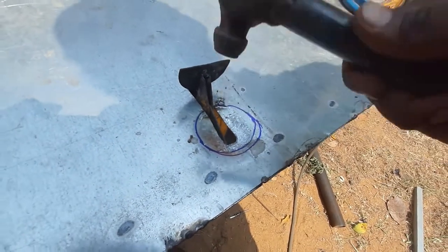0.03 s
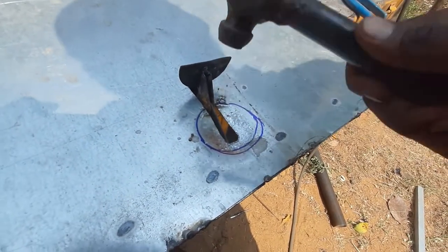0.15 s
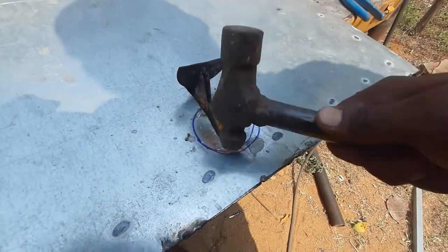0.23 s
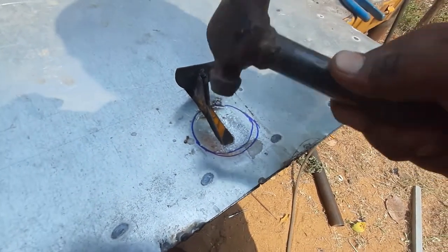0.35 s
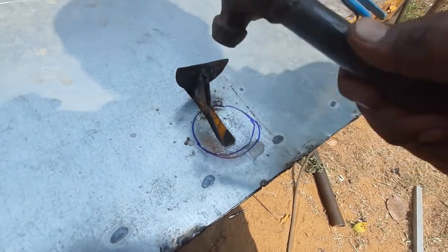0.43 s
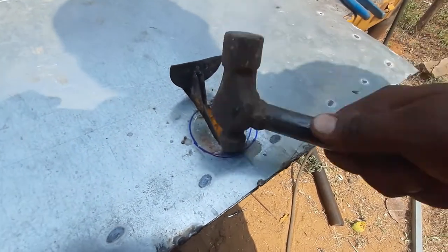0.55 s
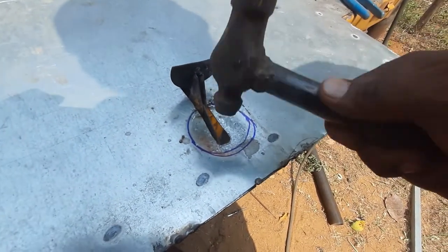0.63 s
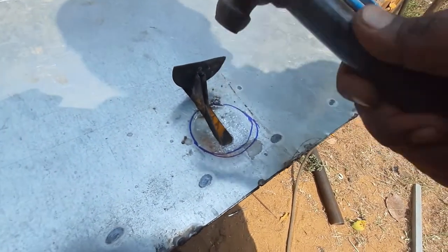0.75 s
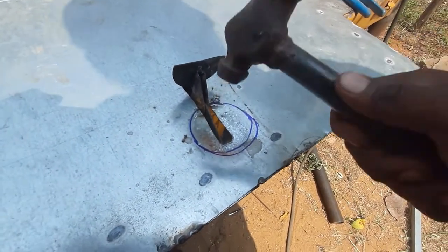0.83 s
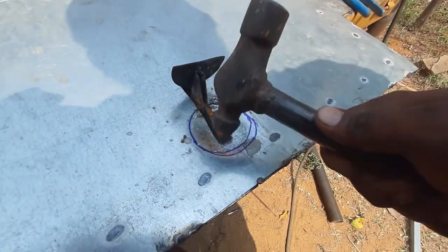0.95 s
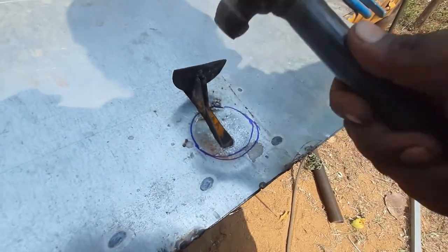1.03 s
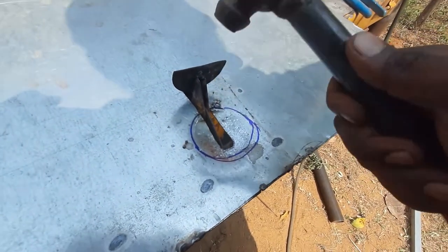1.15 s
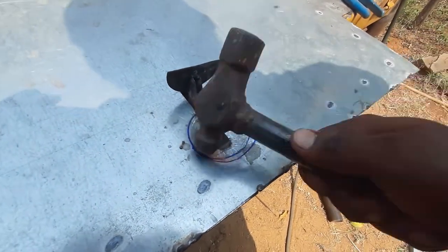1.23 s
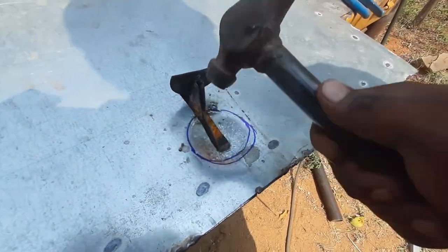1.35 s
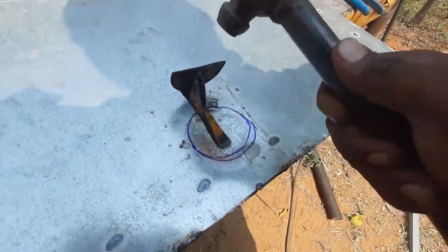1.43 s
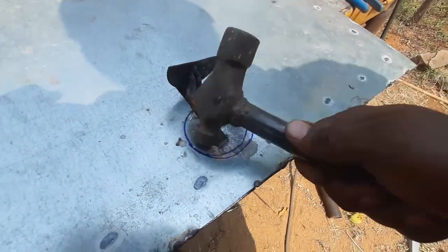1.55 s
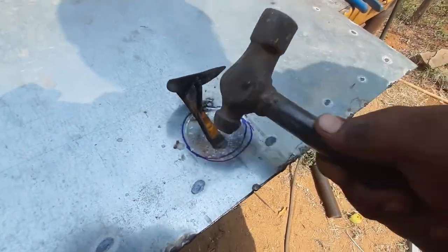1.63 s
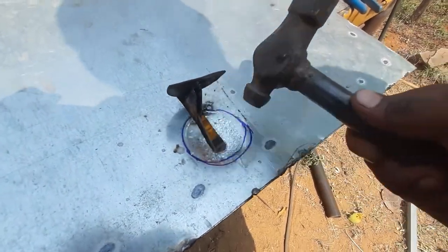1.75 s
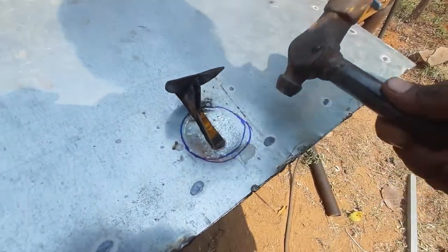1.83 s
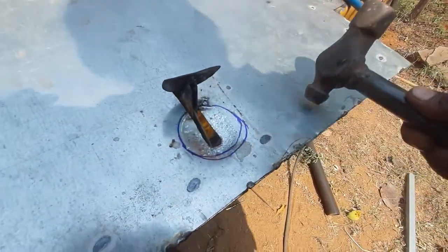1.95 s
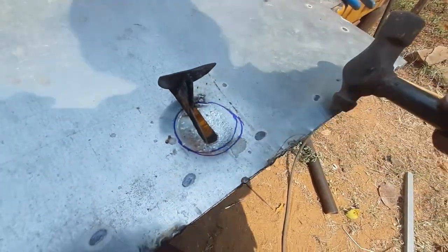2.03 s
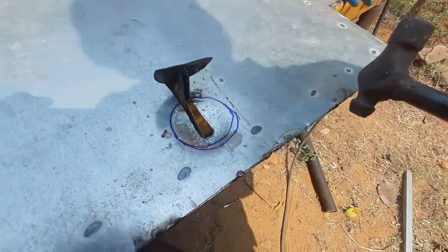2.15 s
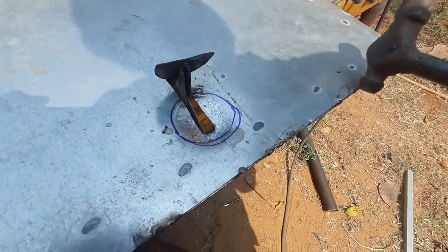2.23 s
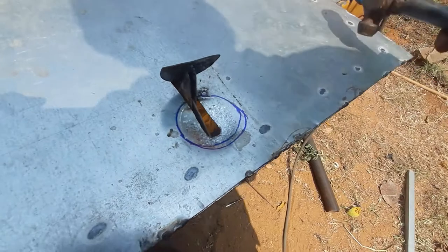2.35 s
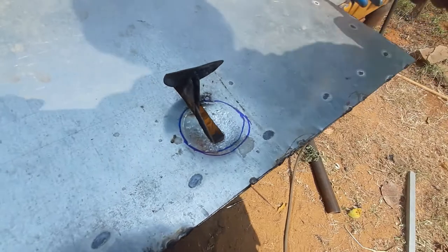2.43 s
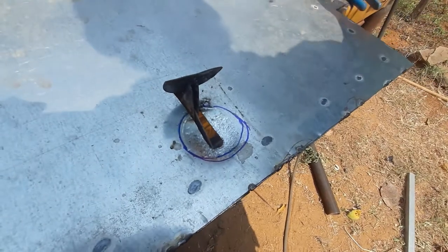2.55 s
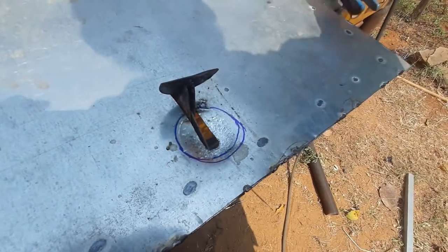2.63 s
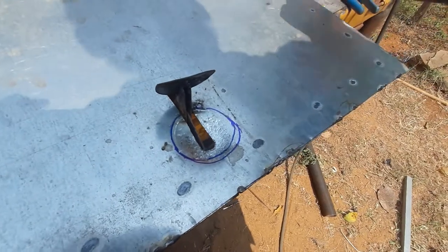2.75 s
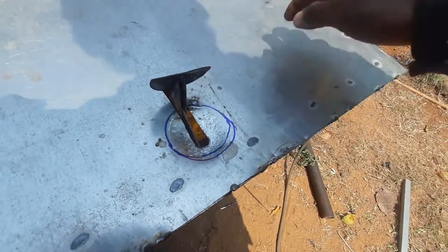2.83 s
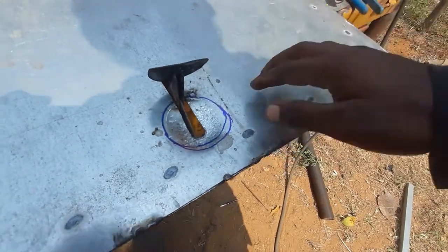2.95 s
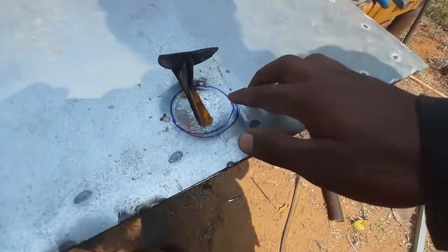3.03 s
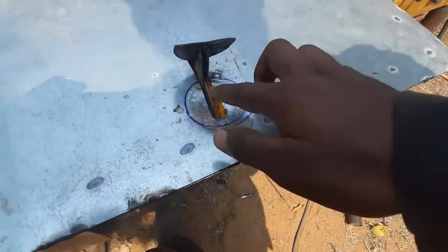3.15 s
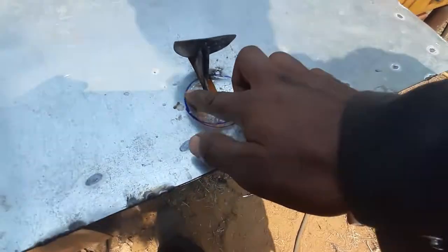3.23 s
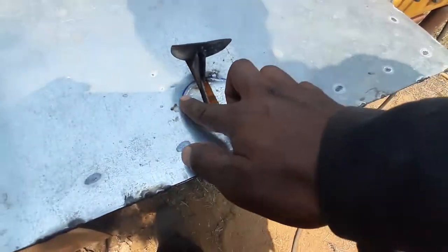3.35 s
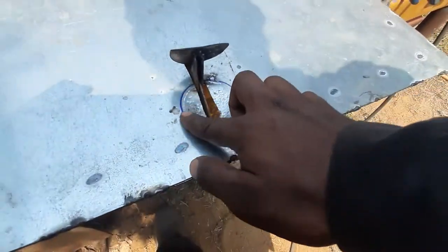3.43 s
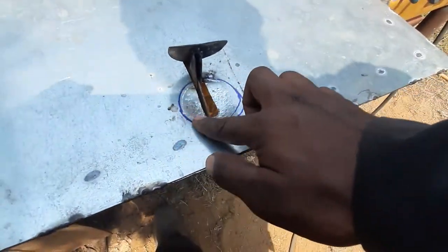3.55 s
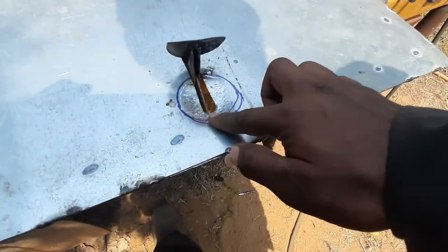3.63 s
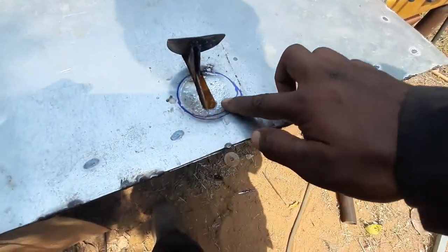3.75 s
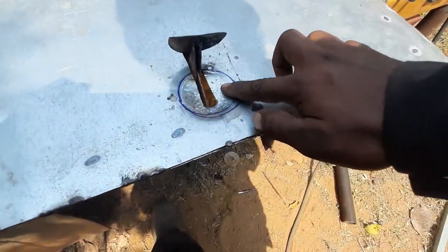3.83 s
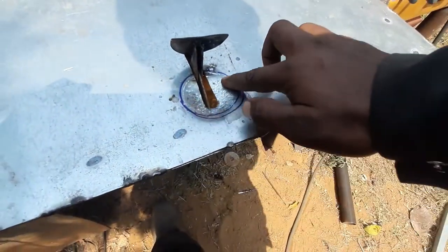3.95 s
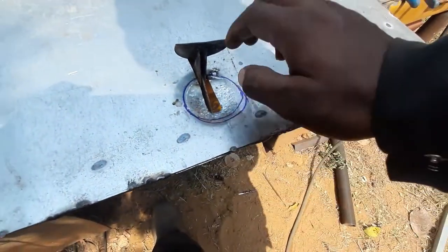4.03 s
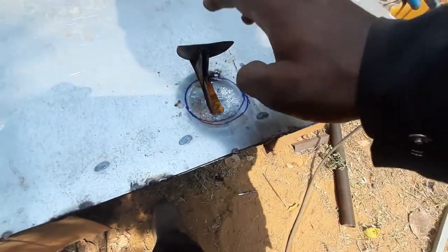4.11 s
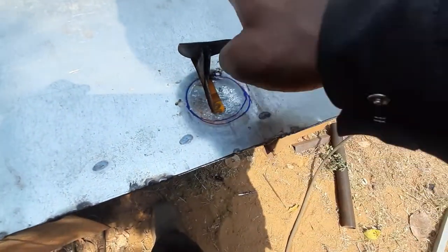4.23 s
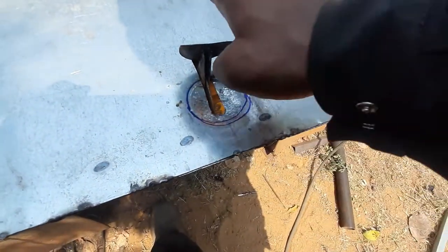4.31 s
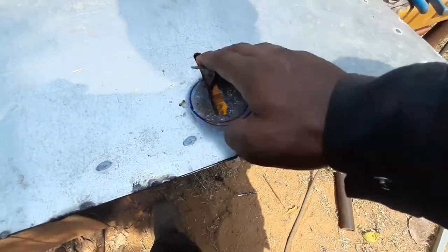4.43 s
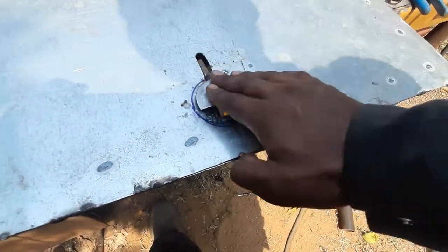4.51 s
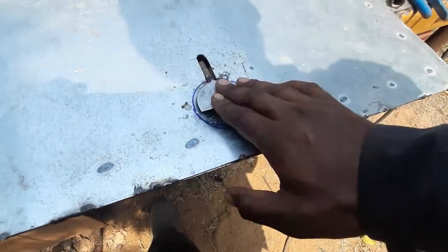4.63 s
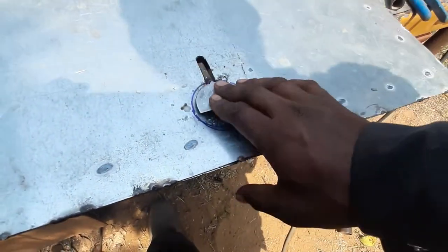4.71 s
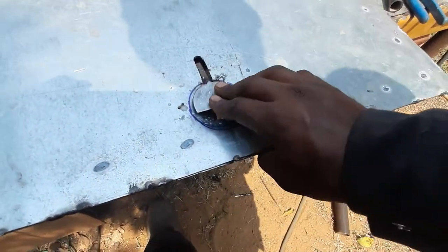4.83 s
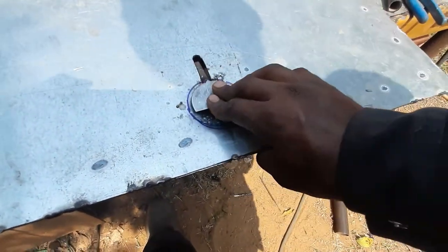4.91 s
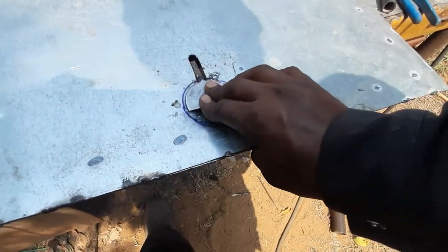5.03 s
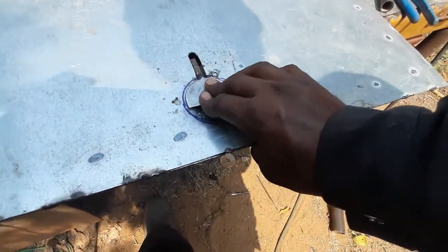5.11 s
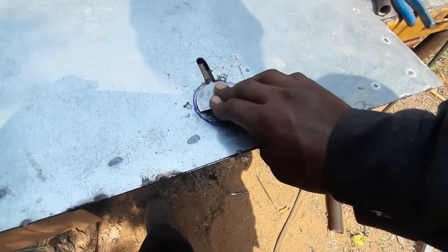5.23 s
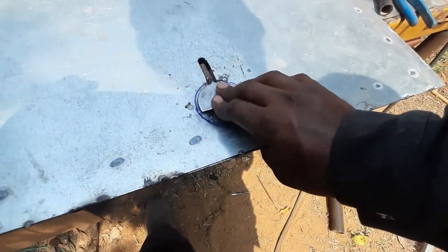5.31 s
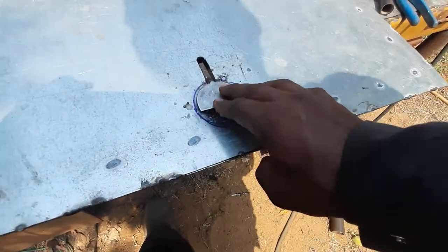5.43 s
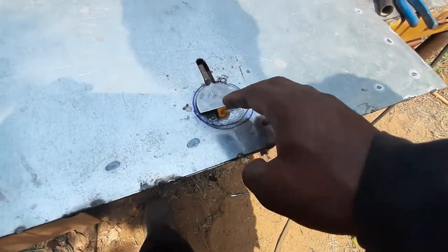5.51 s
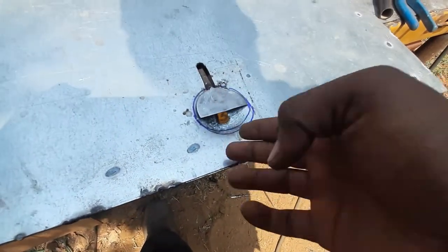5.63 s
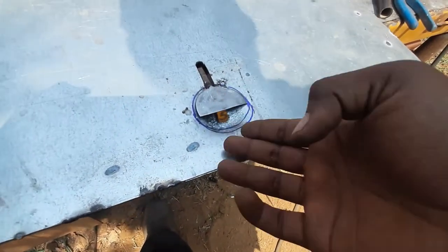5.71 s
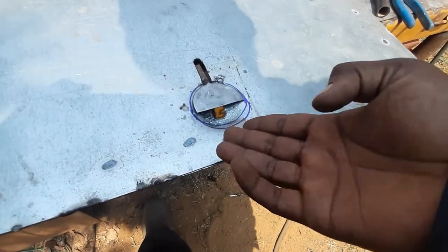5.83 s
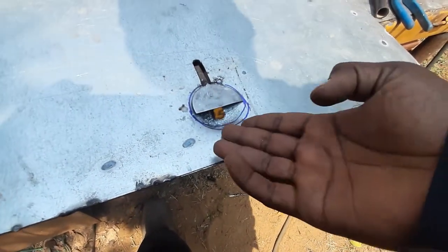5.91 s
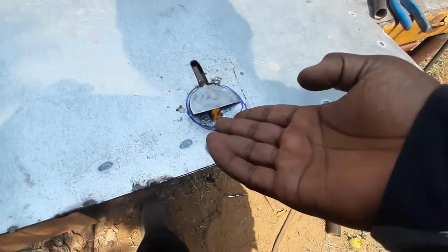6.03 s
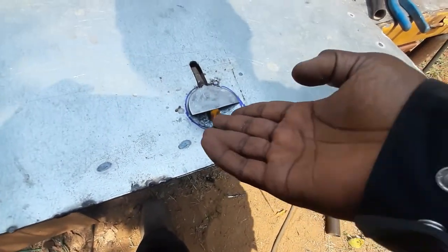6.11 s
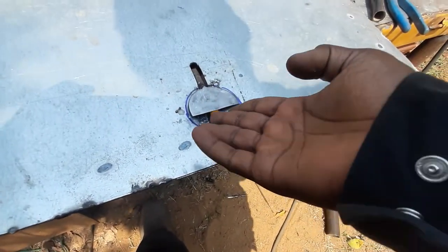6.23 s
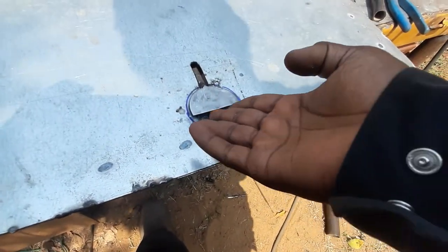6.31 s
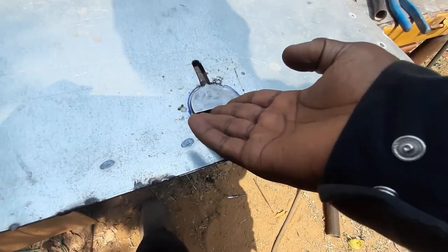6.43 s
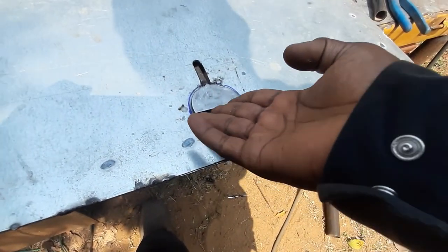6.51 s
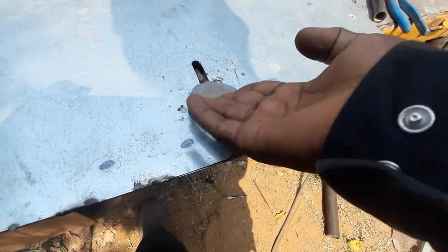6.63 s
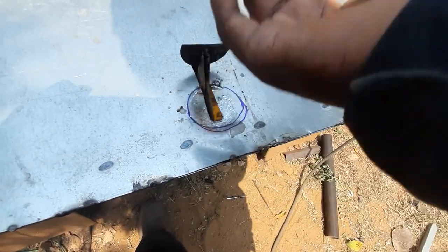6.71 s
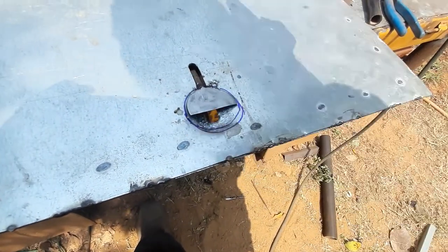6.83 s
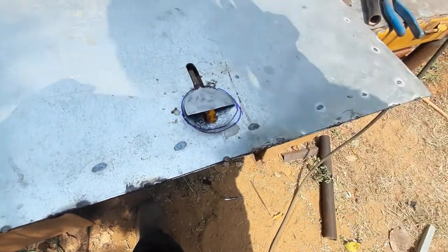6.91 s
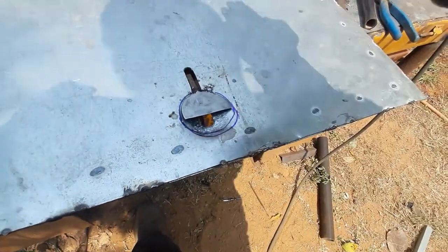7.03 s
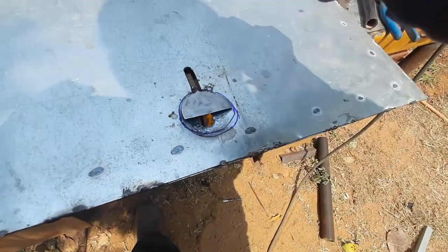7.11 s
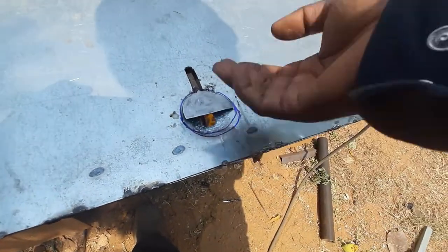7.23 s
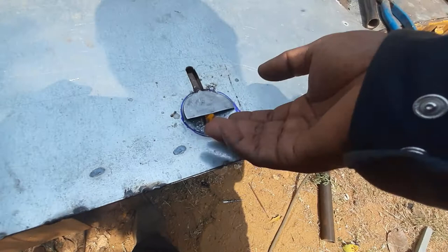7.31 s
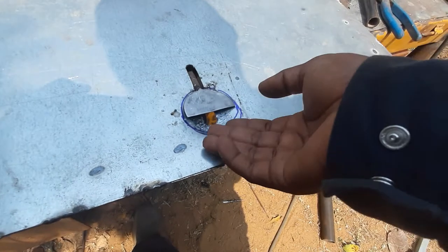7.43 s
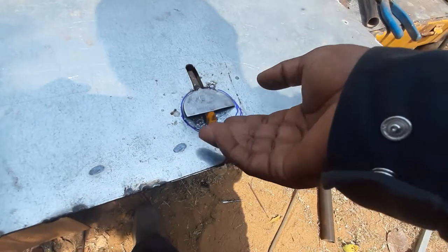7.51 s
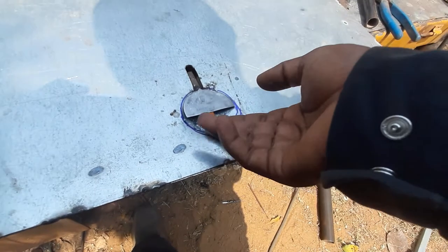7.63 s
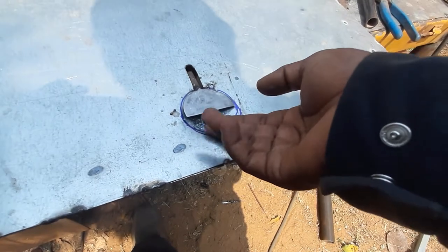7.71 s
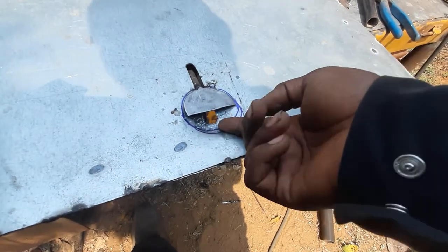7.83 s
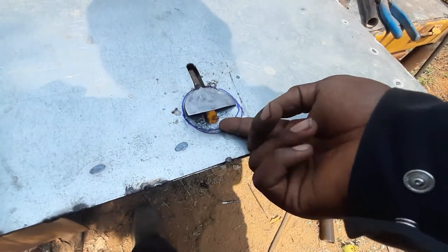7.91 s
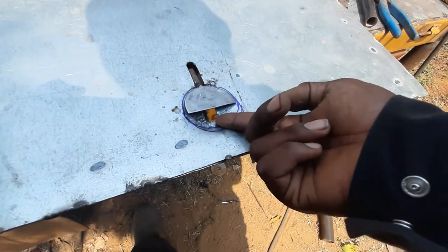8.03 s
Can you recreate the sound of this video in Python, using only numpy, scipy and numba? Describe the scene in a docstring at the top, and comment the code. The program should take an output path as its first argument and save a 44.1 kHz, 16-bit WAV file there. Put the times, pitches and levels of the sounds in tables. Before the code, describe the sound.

The tail of one blow, then five loud, harsh steel crashes on a resonant sheet. After a pause the hammer lands heavily, rebounds and rings briefly. Quieter handling follows: fingertips hissing on steel, a small metal flap clacking and ringing, cloth rustling and low rumble as an arm leans, then a sharp cluster of knocks. Close stereo microphones in open air, compressed on loud contacts.

```python
"""Hard, crashing steel, close by and outdoors: a hammer drives a chisel into a big sheet, about three blows a second.
The hammer is then dropped on the sheet; a hand rubs over the metal and tips the loose piece in the cut, which clatters.
Each contact is a push and chatter played into dense plate modes that crash and die into a low drone.
Filtered noise makes hand, sleeve and open air; decaying sines ring hammer head and piece.
A microphone pair hears it in stereo, and the recorder's limiter flattens the loud contacts."""
import sys
import numpy as np
from scipy import signal
from scipy.fft import rfft, irfft
from scipy.io import wavfile
from scipy.ndimage import uniform_filter1d
from numba import njit

SR = 44100
rng = np.random.default_rng(int(sys.argv[2]) if len(sys.argv) > 2 else 0)


def materialize(psi):
    """Save the field psi as 16-bit PCM at rate SR to the path in sys.argv[1].

    A 1-D psi becomes a single channel; in a 2-D psi each row is a channel.
    """
    bounded = np.clip(np.atleast_2d(psi).T, -1, 1)
    quanta = np.round(bounded * 32767).astype(np.int16)
    wavfile.write(sys.argv[1], SR, quanta)


N = 355446
TIME = np.arange(N) / SR
RING_TIME = np.arange(3 * SR) / SR
PUSH_TIME = np.arange(8192) / SR
TOP_HZ = 15900

# open air, low rumble: (frequency [Hz], relative density [dB per Hz])
RUMBLE_SPECTRUM = [(25, -3.5), (55, 4), (105, -1.5), (200, -1.5), (400, -3), (700, -17), (1200, -24),
                   (2100, -28.5), (3200, -45)]
# open air, faint hiss: (frequency [Hz], relative density [dB per Hz])
AIR_SPECTRUM = [(500, 8), (2000, 6), (3000, -3), (5500, -7), (8000, -2), (10000, -11), (15000, -14)]
RUMBLE_DB, AIR_DB = -65, -79.5

# fingertips wiping the sheet: (time [s], length [s], level [dB])
WIPES = [(3.35, 0.12, -65), (3.52, 0.37, -67.5), (5.35, .12, -74), (6.0, 0.4, -77.5), (6.32, .08, -70.5)]
WIPE_ATTACK_S, WIPE_T60_S = 0.035, 0.33
# the arm shifting along the sheet: (time [s], length [s], level [dB])
ARM_MOVES = [(4.25, 0.17, -81), (5.5, 0.42, -72), (5.95, 0.8, -61), (7.45, 0.39, -79)]
ARM_ATTACK_S, ARM_T60_S = 0.11, 0.72
# hiss of skin on steel: (frequency [Hz], relative density [dB per Hz])
SKIN_SPECTRUM = [(2000, -13), (5000, -10), (8000, -5.5), (12500, -1.5), (16000, -1)]
# rustle of the sleeve: (frequency [Hz], relative density [dB per Hz])
SLEEVE_SPECTRUM = [(400, -9), (1100, -9), (2000, -0.5), (3000, -15), (6000, -21), (12000, -30.5)]
# rumble of the sheet under the leaning arm: (frequency [Hz], relative density [dB per Hz])
LEAN_SPECTRUM = [(30, -2), (55, 4.5), (115, 4), (260, -0.5), (420, -3), (700, -12.5), (1300, -24),
                 (3000, -46)]
# rumble level under a 0 dB rustle, and dB of rumble per dB of rustle
LEAN_DB, LEAN_SLOPE = -26, 0.41

# clicks of steel edges and fingernails: (time [s], level [dB], pitch [Hz])
TICKS = [(4.5132, -7.5, 5000), (4.952, -57, 10800), (4.98, -53, 10300), (5.618, -72, 2980),
         (6.453, -40, 5060), (6.566, -53, 12400), (6.837, -18, 6250), (7.82, -66.5, 3150)]

# stereo picture: (frequency [Hz], left minus right [dB], likeness of the two sides [0-1])
STEREO_SPREAD = [(60, 3, .65), (250, .5, .85), (550, .5, .6), (1100, 6, .15), (2000, 8.5, .03),
                 (4000, 4, .02), (8000, -3, .02), (14000, -4.5, .02)]
# dense modes of the sheet:
# (frequency [Hz], relative density [dB per Hz], crash t60 [s], drone under crash [dB], drone t60 [s])
SHEET_MODES = [(30, -28.5, 0.41, -13.5, 2.2), (60, -5, 0.46, -11, 1.8), (109, -2, 0.53, -19.5, 4),
               (260, 1, 0.31, -5, 1.92), (516, 2.5, 0.47, -14.5, 1.85), (807, -4.5, 0.6, -9.5, 1.56),
               (1035, -9, 0.45, -10, 1.5), (1560, -6, 0.54, -21, 1.08), (1940, 1, 0.44, -23, 1.3),
               (2920, -10, 0.42, -27.5, .8), (5404, -18.5, 0.34, -26, 0.7),
               (7950, -18.5, 0.37, -36.5, 0.18), (9350, -26, 0.37, -32.5, 0.34),
               (11500, -13, 0.28, -31.5, 0.32)]
# the sheet giving under the point of contact: (frequency [Hz], level [dB], t60 [s])
FLEX_MODES = [(63.6, -19.5, 0.18), (185, -2, 0.035), (486, -3.5, 0.047)]
# low modes that hum on between blows: (frequency [Hz], level [dB], t60 [s])
HUM_MODES = [(105.7, -37.5, 2), (203.8, -27.5, 1.7), (244.4, -31, 2.5), (286, -29.5, 1), (452, -32, 1.0)]

# the loose piece tipping and knocking in the cut:
# (time [s], force [dB], boom and thud [dB], treble [dB], chatter decay constant [s])
PIECE_KNOCKS = [(4.428, -19, -1.5, 2.5, 0.02), (4.455, -9, -5, -9.5, 0.0093), (4.513, -8, -18.5, -2, 0.002),
                (5.2065, -18.5, 2.5, -10, 0.013), (6.454, -35.5, 12, -16.5, 0.013),
                (6.661, -27, 2, -3.5, 0.029), (6.677, -10, -6, 1.5, 0.013), (6.708, -9.5, -7, -.5, 0.0045),
                (6.779, -10.5, -15.5, -1.5, 0.0064), (6.839, -11.5, -11, 2, 0.011),
                (7.360, -35.5, -7, -9, .015)]
# snaps that set the piece ringing: (time [s], level [dB])
PIECE_RINGS = [(4.5132, -19.5), (6.839, -28.5)]
# ringing of the piece, with a close pair that beats: (frequency [Hz], level [dB], t60 [s])
PIECE_MODES = [(1574, -10, .75), (1584, 1, .78), (1682, -4, .42), (2008, 0, .33), (2062, 2, .33),
               (1114, -10, .9), (1211, -14, .9), (1460, -8, .6), (1800, -5, .6), (2268, -10, .5),
               (2918, -10, .26), (3192, -12, .26), (6207, -14, .2)]

# the hammer landing and rocking on the sheet: (time [s], force [dB], thud [dB], treble [dB])
HAMMER_DROP = [(2.623, -7, 6, -5.5), (2.6325, -7, -11.5, 9.5), (2.682, -10, 7.5, 3.5),
               (2.724, -10, -6, 0.5), (2.867, -20.5, -0.5, 4), (2.911, -5.5, -0.5, 0.5),
               (3.006, -11.5, 1, -2), (3.057, -19.5, -2.5, 2)]
# its first landing booms with full weight, the rebounds much less
LANDING_BOOM_DB, REBOUND_BOOM_DB, DROP_CHATTER_S = 2, -8.5, 0.007
# bounces that set the head ringing: (time [s], level [dB])
HAMMER_RINGS = [(2.633, -44), (2.724, -26.5)]
# ringing of the head: (frequency [Hz], level [dB], t60 [s], t60 once it lies still [s])
HAMMER_MODES = [(2585, 0, 1.6, .2), (3381, -2, 2.4, .15), (3811, -19, 3.2, 3.1), (4335, -6, .8, .15),
                (3017, -5, .5, .2), (6105, -5, .25, .15), (7607, -9, .4, .15), (8484, -12, .4, .15)]
HAMMER_REST_S = 3.06
# how far up the sheet is shaken by the flat of the hammer and by the light piece
DROP_REACH_HZ, PIECE_REACH_HZ = 8000, 5500

# hammer on chisel: (time [s], force [dB])
CHISEL_BLOWS = [(-.07, -2.5), (.2493, 0.5), (0.5716, -0.5), (.9264, -1.5), (1.2599, -1), (1.5747, -1.5)]
# the chisel meets the sheet the same way at every blow
BLOW_BOOM_DB, BLOW_THUD_DB, BLOW_TREBLE_DB, BLOW_CHATTER_S = -2.05, -1.5, 1, 0.008


def undb(db):
    """Decibels to gain."""
    return 10 ** (np.asarray(db) / 20)


def fade(t, t60):
    """Exponential decay, 60 dB down after t60."""
    return np.exp(-np.log(1000) * t / np.maximum(t60, 1e-3))


def at_hz(table, hz):
    """The columns of a table, read on a log-frequency axis."""
    points, *columns = np.transpose(table)
    log_hz = np.log(np.maximum(hz, 1))
    return [np.interp(log_hz, np.log(points), column) for column in columns]


def add(out, sound, start):
    """Mix a sound in at a time in seconds; it may overhang either end."""
    i = int(round(start * SR))
    a, b = max(i, 0), min(i + sound.shape[-1], N)
    out[..., a:b] += sound[..., a - i:b - i]


def colour(x, spectrum):
    """Causal filter with the given (Hz, dB) points, by way of the cepstrum."""
    size = 2048
    gain = undb(at_hz(spectrum, np.fft.rfftfreq(size, 1 / SR))[0])
    cepstrum = irfft(np.log(gain))
    # folding the cepstrum onto positive times gives minimum phase
    cepstrum[1:size // 2] *= 2
    cepstrum[size // 2 + 1:] = 0
    impulse = irfft(np.exp(rfft(cepstrum)))
    return signal.fftconvolve(x, impulse)[:len(x)]


def dull(x, hz):
    """Gentle one-pole low-pass."""
    return signal.sosfilt(signal.butter(1, hz, fs=SR, output="sos"), x)


def pair(likeness, size):
    """Spectra of two white noises with a given correlation."""
    mid, side = rfft(rng.standard_normal((2, size)))
    c = np.clip(likeness, 0, 1)
    return np.sqrt((1 + c) / 2) * mid + np.sqrt((1 - c) / 2) * side * np.array([[1], [-1]])


def noise(spectrum, likeness, size=N):
    """Stereo noise of a given colour, rms 1."""
    gain = undb(at_hz(spectrum, np.fft.rfftfreq(size, 1 / SR))[0])
    x = irfft(pair(likeness, size) * gain, size)
    return x / x.std()


def uneven(rate, depth_db):
    """A gain that wanders at random, with rate new values a second."""
    steps = rng.standard_normal(400)
    return undb(depth_db * np.interp(TIME * rate, np.arange(len(steps)), steps))


def outdoors():
    """The open air around the sheet: low, restless rumble under a faint hiss."""
    rumble = noise(RUMBLE_SPECTRUM, likeness=0.75) * undb(RUMBLE_DB)
    hiss = noise(AIR_SPECTRUM, likeness=0.1) * undb(AIR_DB)
    return rumble * uneven(rate=8.9, depth_db=1.5) + hiss


def strokes(events, attack_s, t60):
    """Gain of sliding movements: each swells, holds until its length is up and dies away."""
    gain = np.zeros(N)
    for start, length, db in events:
        swell = np.clip((TIME - start) / attack_s, 0, 1)
        gain += undb(db) * swell * fade(np.maximum(TIME - start - length, 0), t60)
    return gain


def hand():
    """Skin hisses over the sheet; the moving arm rustles its sleeve and makes the sheet rumble."""
    arm = strokes(ARM_MOVES, ARM_ATTACK_S, ARM_T60_S)
    skin = noise(SKIN_SPECTRUM, likeness=0) * strokes(WIPES, WIPE_ATTACK_S, WIPE_T60_S)
    sleeve = noise(SLEEVE_SPECTRUM, likeness=0.11) * arm
    lean = noise(LEAN_SPECTRUM, likeness=0.88) * undb(LEAN_DB) * arm ** LEAN_SLOPE
    return (skin + sleeve) * uneven(rate=19, depth_db=0.4) + lean


def ticks():
    """Small hard contacts, each a fading noise in a narrow band."""
    out = np.zeros((2, N))
    for start, db, hz in TICKS:
        tick = noise([(hz / 1.2, -22), (hz, 0), (hz * 1.4, -22)], likeness=0, size=len(PUSH_TIME))
        add(out, undb(db) * tick * fade(PUSH_TIME, 0.0347), start)
    return out


def ring(hits, hz, db, t60):
    """One clear mode; on the whole, the higher it is, the more its phase differs between the microphones."""
    out = np.zeros((2, N))
    pan_db, likeness = at_hz(STEREO_SPREAD, hz)
    pan = undb(np.array([[pan_db], [-pan_db]]) / 2)
    lag = np.array([[0], [rng.choice([-1, 1]) * np.arccos(np.clip(likeness, 0, 1))]])
    for start, hit_db in hits:
        phase = 2 * np.pi * (hz * RING_TIME + rng.random()) + lag
        add(out, pan * undb(db + hit_db) * fade(RING_TIME, t60) * np.sin(phase), start)
    return out


def hum():
    """Every blow tops up the strongest low modes."""
    return sum(ring(CHISEL_BLOWS, hz, db, t60) for hz, db, t60 in HUM_MODES)


def sheet_response(count=28):
    """Countless plate modes, in bands: most die in a short crash, a few drone on, longer in the bass."""
    hz = np.fft.rfftfreq(len(RING_TIME), 1 / SR)
    pan_db, likeness = at_hz(STEREO_SPREAD, hz)
    level_db = at_hz(SHEET_MODES, hz)[0] + np.array([pan_db, -pan_db]) / 2
    modes = pair(likeness, len(RING_TIME)) * undb(level_db)
    edges = np.geomspace(25, TOP_HZ, count + 1)
    out = 0
    for lo, hi in zip(edges, edges[1:]):
        centre = np.sqrt(lo * hi)
        _, crash_t60, drone_db, drone_t60 = at_hz(SHEET_MODES, centre)
        band = irfft(modes * ((hz >= lo) & (hz < hi)), len(RING_TIME))
        # long bending waves travel slowly, so the bass builds up after the treble
        build = 1 - np.exp(-RING_TIME / (0.00041 + 2 / centre))
        decay = fade(RING_TIME, crash_t60) + undb(drone_db) * fade(RING_TIME, drone_t60)
        out = out + band * build * decay
    return out


def thump():
    """The sheet is shoved bodily at the contact before its waves spread."""
    return sum(undb(db) * fade(PUSH_TIME, t60) * np.sin(2 * np.pi * hz * PUSH_TIME)
               for hz, db, t60 in FLEX_MODES)


def clack(t60):
    """The bright, brief sound of the contact itself."""
    spectrum = [(1500, -18), (3500, 0.5), (5500, -1), (10000, 0.5), (14000, 2)]
    return noise(spectrum, likeness=0, size=len(PUSH_TIME)) * fade(PUSH_TIME, t60)


def strike(events, sheets, contact, chatter_db, boom_hz, thud_hz, treble_hz):
    """Each contact is a sharp push and a short chatter of steel on steel, played into the sheet."""
    out = np.zeros((2, N))
    for start, db, boom_db, thud_db, treble_db, chatter_s in events:
        force = rng.standard_normal(len(PUSH_TIME)) * np.exp(-PUSH_TIME / chatter_s)
        # chatter energy relative to the single-sample push
        force *= undb(chatter_db) / np.linalg.norm(force)
        force[0] += 1
        spectrum = [(boom_hz, boom_db), (thud_hz, thud_db), (1200, 0), (2400, 0),
                    (treble_hz, treble_db), (15000, treble_db - 6.5)]
        force = colour(force / np.linalg.norm(force), spectrum)
        # no two contacts share their force among the modes in quite the same way
        share = rng.standard_normal(len(sheets))
        body = np.tensordot(share / np.linalg.norm(share), sheets, 1)
        body[:, :len(PUSH_TIME)] += contact
        add(out, undb(db) * signal.fftconvolve(body, force[None], axes=1), start)
    return out


def loose_piece():
    """The piece rings when it snaps against the rim of the cut."""
    return sum(ring(PIECE_RINGS, hz, db, t60) for hz, db, t60 in PIECE_MODES)


def piece_knocks(sheets):
    """Boom and thud rise together with the weight of the finger behind each knock."""
    events = [(start, db, bass_db, bass_db, treble_db, chatter_s)
              for start, db, bass_db, treble_db, chatter_s in PIECE_KNOCKS]
    contact = undb(-7) * thump() + undb(-3.5) * clack(t60=0.14)
    return strike(events, dull(sheets, PIECE_REACH_HZ), contact,
                  chatter_db=0, boom_hz=252, thud_hz=527, treble_hz=5600)


def hammer_head():
    """The head rings freely while it bounces; lying on the sheet damps all but one mode."""
    resting = np.maximum(TIME - HAMMER_REST_S, 0)
    out = np.zeros((2, N))
    for hz, db, t60, rest_t60 in HAMMER_MODES:
        # from the moment of rest, the free decay gives way to the damped one
        damping = fade(resting, rest_t60) / fade(resting, t60)
        out += ring(HAMMER_RINGS, hz, db, t60) * damping
    return out


def dropped_hammer(sheets):
    """The first landing shoves the sheet with full boom; the rebounds carry less."""
    events = []
    for k, (start, db, thud_db, treble_db) in enumerate(HAMMER_DROP):
        boom_db = LANDING_BOOM_DB if k == 0 else REBOUND_BOOM_DB
        events.append((start, db, boom_db, thud_db, treble_db, DROP_CHATTER_S))
    contact = undb(-1.5) * thump() + undb(-8) * clack(t60=0.068)
    return strike(events, dull(sheets, DROP_REACH_HZ), contact,
                  chatter_db=1.5, boom_hz=302, thud_hz=480, treble_hz=7400)


def chisel_blows(sheets):
    """The chisel drives the full range of the sheet, with one tone balance and a force for each blow."""
    events = [(start, db, BLOW_BOOM_DB, BLOW_THUD_DB, BLOW_TREBLE_DB, BLOW_CHATTER_S)
              for start, db in CHISEL_BLOWS]
    contact = thump() + undb(-25) * clack(t60=0.12)
    return strike(events, sheets, contact, chatter_db=-5, boom_hz=248, thud_hz=491.7, treble_hz=7900)


def scene():
    """Blows, the dropped hammer and the loose piece all sound through the one sheet."""
    # three sets of modes, mixed afresh at each contact
    sheets = undb(6.5) * np.array([sheet_response() for _ in range(3)])
    background = outdoors() + hand() + ticks()
    ringing = hum() + loose_piece() + hammer_head()
    contacts = piece_knocks(sheets) + dropped_hammer(sheets) + chisel_blows(sheets)
    return background + ringing + contacts


@njit
def follow(x, release):
    """Envelope that jumps up at once and sinks slowly."""
    out, e = np.empty(len(x)), 0.
    for i in range(len(x)):
        e = max(x[i], e * release)
        out[i] = e
    return out


def record(dry):
    """The microphones lose the deep bass; a limiter looks a few milliseconds ahead; the top is cut."""
    low_cut = signal.butter(3, 50, "highpass", fs=SR, output="sos")
    sound = signal.sosfilt(low_cut, dry)
    # centred averages let the shared gain fall just before a loud contact
    loudness = np.sqrt(np.abs(uniform_filter1d(np.mean(sound ** 2, axis=0), size=260)))
    envelope = follow(loudness, np.exp(-1 / (0.038 * SR)))
    gain = uniform_filter1d(np.minimum(1, undb(-11) / (envelope + 1e-9)), size=130)
    limited = np.clip(sound * gain, -1, 1)
    top_cut = signal.ellip(8, 0.2, 70, TOP_HZ, fs=SR, output="sos")
    return signal.sosfilt(top_cut, limited)


dry = scene()
out = record(dry)
materialize(out)
```